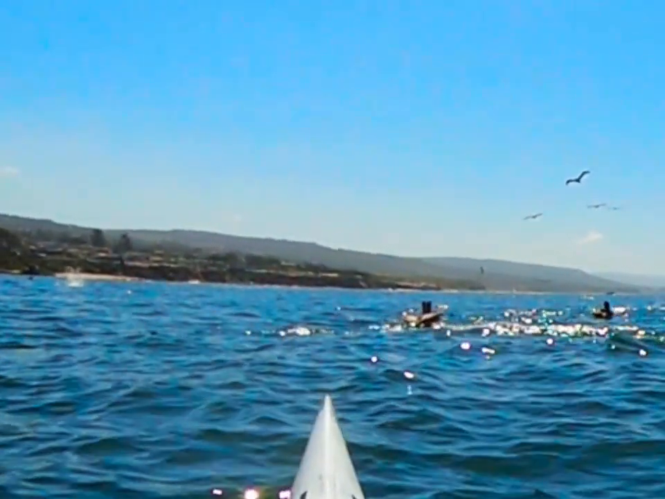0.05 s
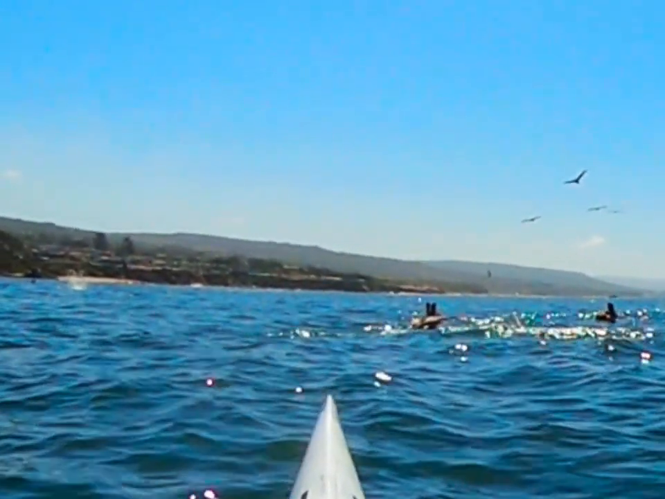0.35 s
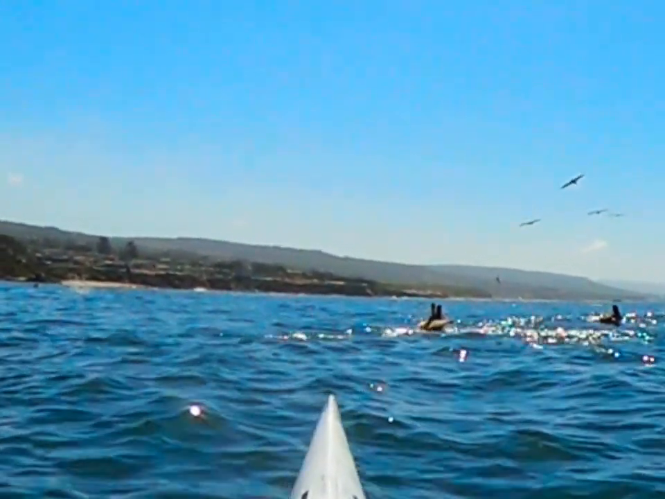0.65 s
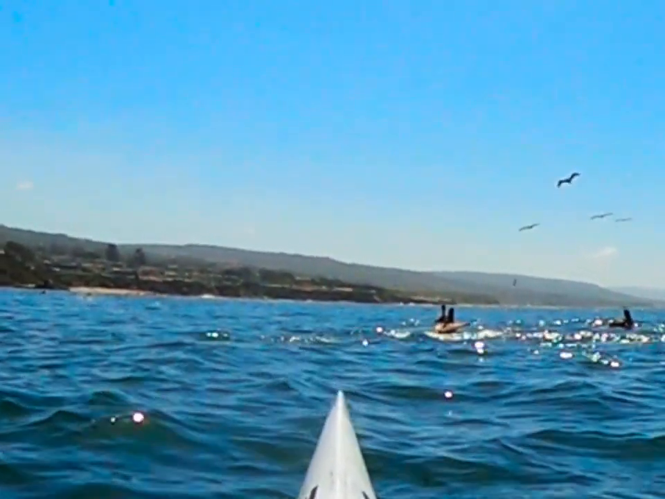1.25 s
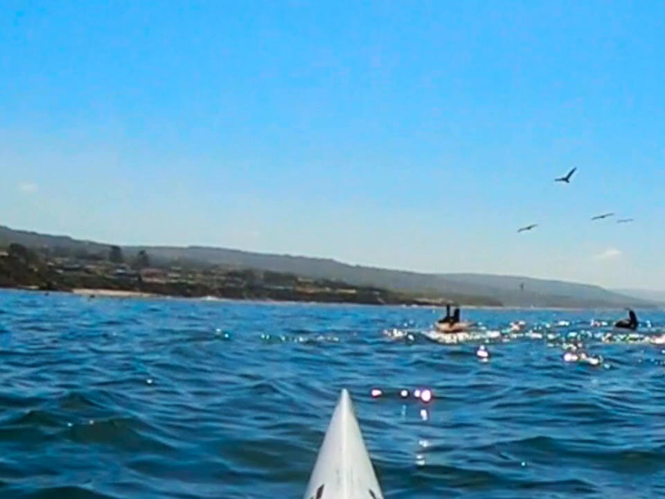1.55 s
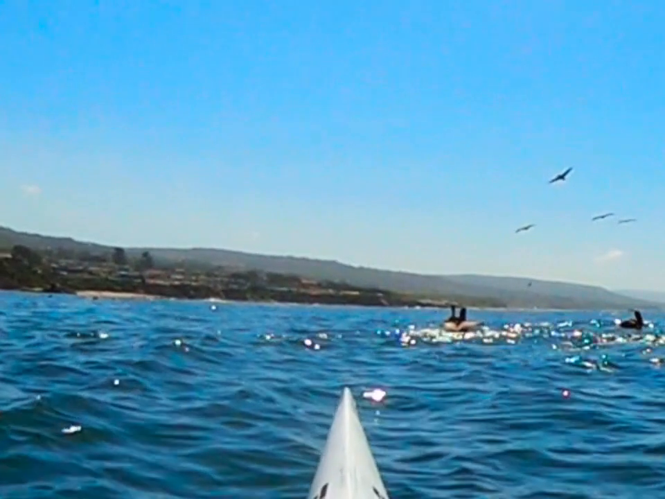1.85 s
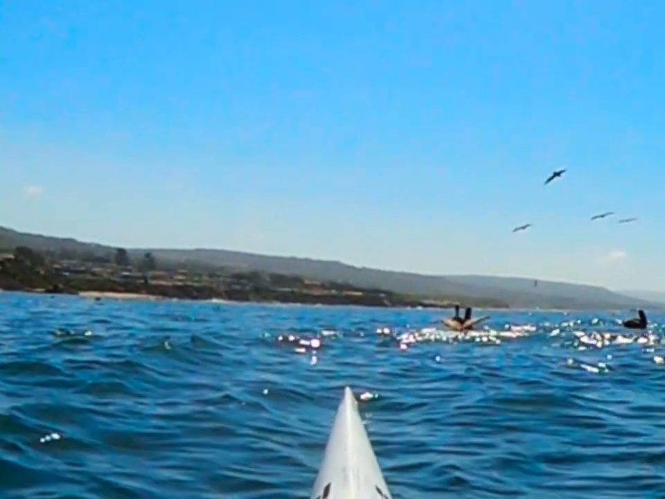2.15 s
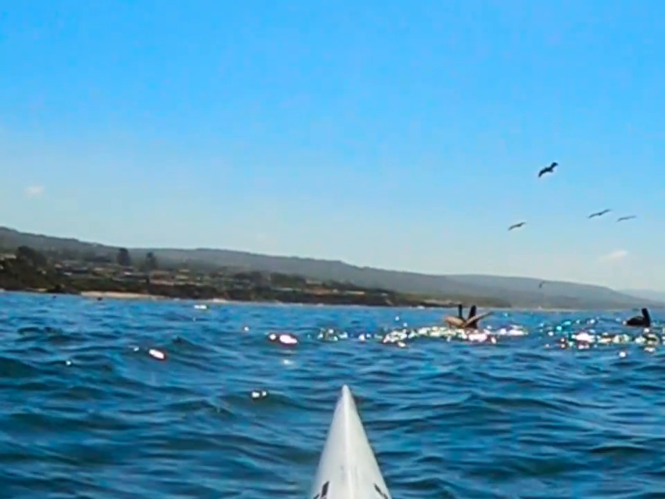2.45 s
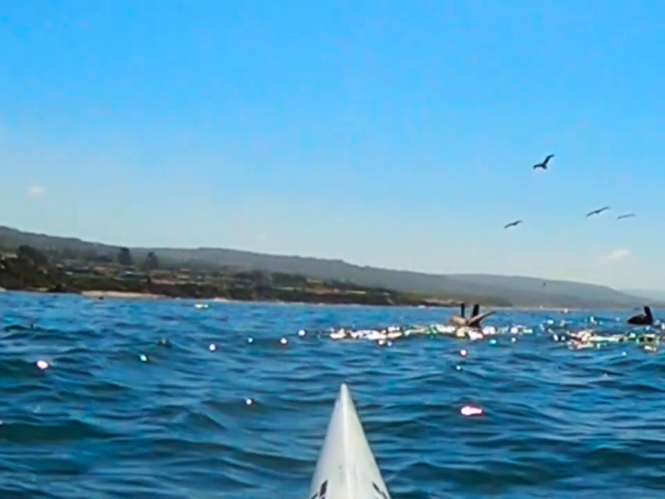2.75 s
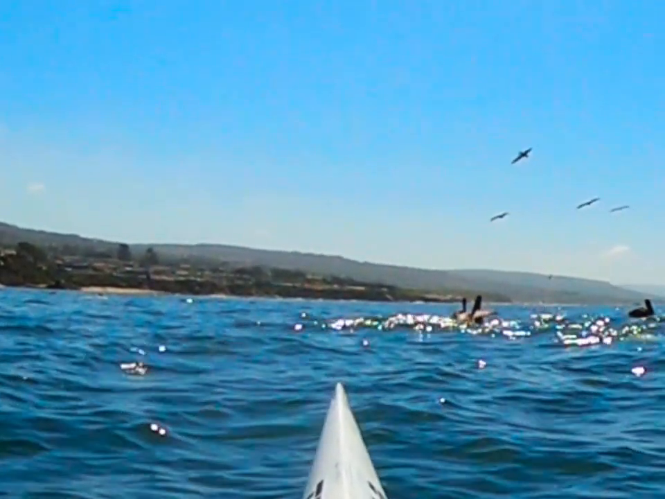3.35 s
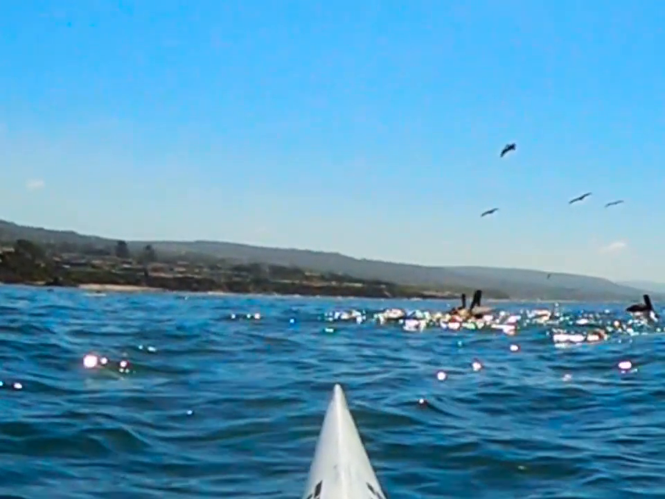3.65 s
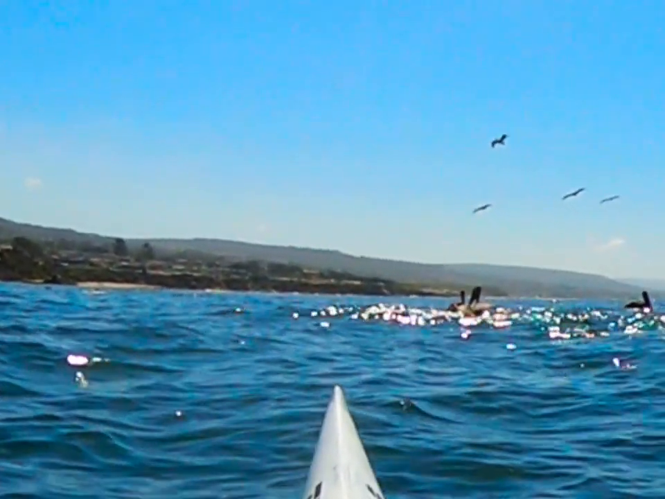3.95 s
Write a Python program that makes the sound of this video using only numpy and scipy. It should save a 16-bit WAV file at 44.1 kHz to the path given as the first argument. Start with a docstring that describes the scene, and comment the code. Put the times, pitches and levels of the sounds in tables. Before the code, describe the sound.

Sea water sloshes against a kayak, first gulping and slapping lightly under the bow, then splashing harder and draining away in bubbles and drips. It sounds muffled through a sealed microphone on deck, with wind rumbling throughout.

```python
"""A kayak rides a choppy sea, heard from a camera in a sealed housing on its deck.
Wind rumbles on the housing from the start. From about 1 s air pockets gulp under the bow and a
wavelet slaps the hull. Near 1.9 s a larger one splashes, then drains away in bubbles and drips.
Throughout, the housing wall dulls the water and the camera's low sample rate adds a faint glassy edge."""
import sys
import numpy as np
from scipy import signal
from scipy.fft import rfft, irfft
from scipy.io import wavfile

SR = 44100
rng = np.random.default_rng(int(sys.argv[2]) if len(sys.argv) > 2 else 0)


def transcribe(u):
    """Save the signal u as a 16-bit wav file named by the first command-line argument.

    u: samples, shape (n,) or (channels, n), limited to [-1, 1]; the rate is SR.
    q: integer samples, one column per channel.
    """
    v = np.clip(np.atleast_2d(u).T, -1, 1)
    q = np.round(v * 32767).astype(np.int16)
    wavfile.write(sys.argv[1], SR, q)


N = 176400
T = np.arange(N) / SR


def from_db(db):
    """Decibels to gain."""
    return 10 ** (np.asarray(db) / 20)


def unit_power(x):
    """Scale to an RMS of one."""
    return x / np.sqrt(np.mean(x ** 2) + 1e-20)


def fader(rows):
    """A gain ride through (seconds, dB) points."""
    return from_db(np.interp(T, *np.transpose(rows)))


def equalise(x, points):
    """Causal (minimum-phase) EQ that follows (Hz, dB) points."""
    size = 2 * N
    hz, db = np.transpose(points)
    curve = np.interp(np.log(np.arange(N + 1) * SR / size + 1), np.log(hz), db)
    cepstrum = irfft(np.log(from_db(curve)))
    cepstrum[1:N] *= 2
    cepstrum[N + 1:] = 0
    return irfft(rfft(x, size) * np.exp(rfft(cepstrum)))[:N]


def noise(points):
    """Steady noise coloured by (Hz, dB) points, at unit power."""
    hz, db = np.transpose(points)
    curve = np.interp(np.log(np.arange(N // 2 + 1) * SR / N + 1), np.log(hz), db)
    return unit_power(irfft(rfft(rng.standard_normal(N)) * from_db(curve), N))


def drift(per_s):
    """Random wander through per_s new values a second, at unit power."""
    knots = rng.standard_normal(4000)
    return unit_power(np.interp(T * per_s, np.arange(len(knots)), knots))


def add(out, start_s, sound):
    """Drop a sound into the mix at its cue."""
    i = int(np.clip(start_s * SR, 0, N - 1))
    out[i:i + len(sound)] += sound[:N - i]


def bubble(hz, cycles, pitch_rise=0.044, attack_s=0.00055):
    """A bubble rings down by 60 dB in so many cycles, rising a little in pitch."""
    life_s = cycles / hz
    t = T[:int(life_s * SR) + 2]
    tone = np.sin(2 * np.pi * hz * t * (1 + pitch_rise * t / life_s / 2))
    return tone * np.exp(-np.log(1000) * t / life_s) * (1 - np.exp(-t / attack_s))


def bubble_cloud(per_s, low_hz, high_hz, cycles, spread_db, tilt_db):
    """Bubbles of random time, level and pitch, tilted in dB per octave, at unit power."""
    out = np.zeros(N)
    draws = rng.random((6000, 4))
    for when, pitch, strength, ring in draws[:int(per_s * N / SR)]:
        hz = low_hz * (high_hz / low_hz) ** pitch
        db = spread_db * min(-np.log(1 - strength), 3) + tilt_db * np.log2(hz / low_hz)
        add(out, when * N / SR, from_db(db) * bubble(hz, cycles * (.5 + ring)))
    return unit_power(out)


# The tone of the open sea's wash. Each row: frequency in Hz, relative level in dB.
SEA_TONE = [(120, -9), (220, -1), (420, -2.5), (620, -10.5), (1000, -20), (1800, -25.5), (2100, -39.5),
            (2400, -63.5), (5000, -79.5)]


def sea():
    """The open sea washes softly behind everything, its level wavering."""
    return from_db(-58 + drift(per_s=16)) * noise(SEA_TONE)


# The ride of the gusts. Each row: time in seconds, level in dB.
WIND_RIDE = [(0, -28), (.42, -35.5), (.66, -30.5), (.9, -32), (1.4, -34.5), (1.72, -34), (2.4, -33),
             (2.9, -33.5), (3.4, -33), (4, -31)]
# The wind's deep rumble. Each row: frequency in Hz, relative level in dB.
WIND_TONE = [(10, 4.5), (20, 8.5), (48, 7), (68, -5), (100, -7.5), (170, -21.5), (300, -42), (700, -84),
             (2500, -110)]


def wind():
    """Wind buffets the housing."""
    return fader(WIND_RIDE) * noise(WIND_TONE)


# The swell of the hull's drumming. Each row: time in seconds, level in dB.
DRUM_RIDE = [(0, -60), (.9, -58.5), (1.5, -51.5), (2.05, -43.5), (2.5, -46.5), (2.85, -46), (3.45, -56),
             (3.75, -44), (4, -55)]
# Its low boom. Each row: frequency in Hz, relative level in dB.
DRUM_TONE = [(50, -19.5), (90, 5.5), (150, 8), (210, 2), (300, -21), (600, -63.5), (2500, -91.5)]


def hull_drum():
    """The hull drums unevenly in the chop."""
    return fader(DRUM_RIDE) * noise(DRUM_TONE) * from_db(1.5 * drift(per_s=11))


# The heave of water along the hull. Each row: time in seconds, relative level in dB.
SLOSH_RIDE = [(0, -58.5), (.55, -54), (.85, -58), (1.15, -48.5), (1.26, -48.5), (1.45, -47.5), (1.6, -51),
              (1.81, -49.5), (1.89, -39.5), (2.01, -37.5), (2.15, -45.5), (2.25, -48), (2.36, -45),
              (2.45, -46), (2.7, -56), (2.95, -54), (3.5, -65.5), (4, -56)]


def slosh():
    """Large, low bubbles roll in churning water along the hull."""
    bubbles = bubble_cloud(per_s=210, low_hz=188, high_hz=446, cycles=11, spread_db=2, tilt_db=0.5)
    churn = noise([(100, -4.5), (200, -6.5), (350, -2.5), (520, -16), (800, -18.5), (1600, -62)])
    return fader(SLOSH_RIDE) * (from_db(-2) * bubbles + from_db(-2.5) * churn)


# Gulps under the bow. Each row: start in seconds, glide time in seconds,
# pitch in Hz at the start and at the end of that time, relative level in dB.
GULP_CUES = [(0.974, 0.043, 280, 279, -45), (1.075, 0.035, 221, 215.5, -40),
             (1.148, 0.029, 260, 216, -38.5), (1.182, 0.04, 279, 357, -47), (1.254, 0.037, 938, 840, -50),
             (1.305, 0.012, 335, 287, -37), (1.323, 0.032, 219, 268, -33), (1.355, 0.034, 271.7, 405, -33),
             (1.839, 0.034, 306, 293, -31.5), (1.918, 0.015, 410, 325, -30.5),
             (2.024, 0.022, 272, 210, -42), (2.294, 0.017, 240, 202, -37), (2.34, 0.031, 343, 307, -42),
             (2.551, 0.032, 255, 225, -42), (2.69, 0.059, 263, 253.5, -44),
             (2.977, 0.033, 1342, 1300, -55.5)]


def gulps(attack_s=0.004, release_s=0.0099, pitch_wobble=0.04):
    """Each trapped air pocket rings, gliding in pitch as the water squeezes or frees it."""
    out = np.zeros(N)
    waver = from_db(0.6 * drift(per_s=130))
    for start_s, glide_s, first_hz, last_hz, db in GULP_CUES:
        t = T[:int((glide_s + release_s) * SR)]
        glide_hz = first_hz * (last_hz / first_hz) ** (t / glide_s)
        hz = glide_hz * (1 + pitch_wobble * drift(per_s=200)[:len(t)])
        phase = 2 * np.pi * np.cumsum(hz) / SR
        tone = np.sin(phase) + from_db(-24) * np.sin(2 * phase)
        ramp = np.clip(np.minimum(t / attack_s, (t[-1] - t) / release_s), 0, 1)
        add(out, start_s, from_db(db) * np.sin(ramp * np.pi / 2) ** 2 * tone)
    return out * waver


# Handfuls of spray landing on the deck. Each row: start in seconds, relative level in dB.
SPATTER_CUES = [(1.145, -53), (1.315, -52), (1.859, -43), (2.079, -49), (2.303, -37.5), (2.542, -35),
                (2.649, -46.5), (3.208, -68)]


def spatters(decay_s=0.011):
    """Fine drops land together in a short, bright patter."""
    bursts, t = np.zeros(N), T[:SR // 12]
    for start_s, db in SPATTER_CUES:
        add(bursts, start_s, from_db(db) * np.exp(-t / decay_s))
    sizzle = noise([(1200, -26), (2200, -5.5), (3000, -1.5), (4300, 2)])
    return bursts * sizzle * from_db(8.6 * drift(per_s=340))


# The ride of spray and foam. Each row: time in seconds, relative level in dB.
SPRAY_RIDE = [(0, -94.5), (.9, -91), (1.15, -72.5), (1.28, -69.5), (1.45, -62.5), (1.62, -79), (1.8, -58),
              (1.868, -40.5), (1.92, -47), (2.0, -53.5), (2.06, -57), (2.11, -60.5), (2.24, -58.5),
              (2.32, -58), (2.46, -59), (2.56, -51.5), (2.68, -55.5), (2.82, -69.5), (2.95, -61),
              (3.07, -79), (3.18, -63.5), (3.28, -74.5), (3.345, -61.5), (3.42, -86.5), (4, -91.5)]
# The bright tone of spray, foam and slap cracks. Each row: frequency in Hz, relative level in dB.
SPRAY_TONE = [(200, -22), (500, -5.5), (1300, -3.5), (2500, -5), (6000, -6)]


def spray(ticks_per_s=450):
    """The waves throw up ticking spray and hissing foam."""
    impulses = (rng.random(N) < ticks_per_s / SR) * rng.choice([-1, 1], N)
    accents = from_db(1.1 * np.minimum(rng.exponential(1, N), 3))
    ticks = unit_power(equalise(impulses * accents, SPRAY_TONE))
    foam = noise(SPRAY_TONE) * from_db(2.2 * drift(per_s=70))
    return fader(SPRAY_RIDE) * (from_db(4.5) * ticks + from_db(1.5) * foam)


# The surge of bubbling at the bow. Each row: time in seconds, relative level in dB.
SPLASH_RIDE = [(0, -71), (.95, -73.5), (1.16, -65), (1.27, -56.5), (1.47, -55.5), (1.62, -67.5),
               (1.82, -56), (1.87, -40.5), (1.92, -42.5), (1.99, -55), (2.04, -49.5), (2.085, -45),
               (2.17, -48), (2.2, -54), (2.28, -56), (2.37, -56.5), (2.5, -59.5), (2.57, -53), (2.82, -63),
               (3.07, -65.5), (3.22, -68.5), (3.5, -79), (4, -84)]


def splash():
    """Water breaks into small bubbles and crackling droplets in a soft wash."""
    bubbles = bubble_cloud(per_s=520, low_hz=513, high_hz=2068, cycles=35, spread_db=2.5, tilt_db=1)
    crackle = bubble_cloud(per_s=280, low_hz=747, high_hz=2620, cycles=4.1, spread_db=6.5, tilt_db=1.5)
    wash = noise([(200, -16), (500, -3.5), (1300, -5), (2000, -3), (3000, -14.5), (6000, -43)])
    return fader(SPLASH_RIDE) * (from_db(-1) * bubbles + from_db(-8) * (crackle + wash))


# The foreground slaps and drips. Each row: start in seconds, bubble pitch in Hz,
# relative bubble level in dB, ring length in cycles, relative crack level in dB.
SLAP_CUES = [(1.015, 2600, -60, 44, -67), (1.209, 1520, -46, 8, -42), (1.254, 1080, -33.5, 11, -40.5),
             (1.378, 1200, -26.5, 7.7, -44), (1.381, 1020, -38.5, 20, -50.5), (1.422, 1630, -42, 18, -34),
             (1.439, 1587, -37, 25, -37.5), (1.441, 625, -40, 18, -41), (1.477, 780, -37.5, 8.3, -43.5),
             (1.54, 710, -43, 10, -54.5), (1.732, 1130, -41.5, 16.6, -47.5), (1.828, 1830, -39.5, 32, -52),
             (1.86, 1135, -30, 12, -28), (1.86, 3110, -27, 12, -34), (1.872, 920, -29, 8, -31),
             (1.884, 864, -30, 12, -34), (1.92, 1020, -29, 13.4, -33), (1.945, 300, -18, 2.9, -47),
             (1.966, 580, -32.5, 13, -33), (1.974, 920, -39.5, 9.1, -44), (2.012, 574, -26, 7.7, -40.5),
             (2.077, 2110, -28, 18, -35), (2.081, 1334, -30, 10, -40.5), (2.085, 622, -25, 6.9, -44),
             (2.118, 1230, -33.5, 8.6, -42), (2.133, 755, -38, 14, -46), (2.158, 1160, -35, 23, -46),
             (2.163, 1460, -32.5, 10, -45), (2.213, 1096, -45.5, 42, -54), (2.306, 630, -42.5, 37, -41),
             (2.366, 1330, -42.5, 27, -39), (2.386, 730, -43.5, 19, -45), (2.462, 1570, -42.5, 22, -46),
             (2.537, 1020, -42, 17, -53), (2.546, 1400, -45, 29, -44), (2.557, 1060, -43, 24, -45),
             (2.584, 1260, -46.5, 35, -50), (2.574, 555, -44, 16, -52), (2.628, 3160, -42.5, 55, -50),
             (2.891, 1230, -49, 21, -53), (2.903, 2710, -48.5, 36, -62.5), (2.927, 3030, -43, 29, -59),
             (2.958, 1090, -42, 18, -44), (2.963, 1500, -41, 25, -36), (3.181, 790, -52, 51, -67.5),
             (3.208, 604, -48, 13, -53)]


def slaps(crack_decay_s=0.0093):
    """Water hits the hull with a brief crack and leaves a ringing bubble."""
    rings, cracks = np.zeros(N), np.zeros(N)
    t = T[:SR // 20]
    for start_s, hz, bubble_db, cycles, crack_db in SLAP_CUES:
        add(rings, start_s, from_db(bubble_db) * bubble(hz, cycles))
        crack = rng.standard_normal(len(t)) * np.exp(-t / crack_decay_s)
        add(cracks, start_s, from_db(crack_db) * crack)
    return from_db(5) * rings + from_db(-1.5) * equalise(cracks, SPRAY_TONE)


def hull_ring(x, t60_s=0.085, build_s=0.013, wet_db=-12):
    """The hollow hull adds a short, dense ring."""
    t = T[:SR // 4]
    envelope = np.exp(-np.log(1000) * t / t60_s) * (1 - np.exp(-t / build_s))
    tail = rng.standard_normal(len(t)) * envelope
    tail /= np.sqrt(np.sum(tail ** 2))
    return x + from_db(wet_db) * signal.fftconvolve(x, tail)[:N]


# What the housing wall lets through. Each row: frequency in Hz, gain in dB.
HOUSING_EQ = [(100, -1.5), (800, -0.5), (1300, 0.5), (1700, -7), (2000, -14), (2450, -18), (3100, -14.5),
              (3600, -21.5), (4100, -32.5), (4700, -47.5)]


def housing(x):
    """The sealed wall muffles the top end."""
    return equalise(x, HOUSING_EQ)


def scene():
    """The water heard through the housing wall, over wind, drumming hull and sea."""
    surface = splash() + spray() + slaps() + spatters()
    water = hull_ring(surface) + slosh() + gulps()
    return (housing(water) + wind() + hull_drum() + sea())[None]


def record(dry, band_hz=4300, step=4, hiss_db=-101, top_cut_hz=14800):
    """The camera's low sample rate mirrors the sound faintly into the treble, over a trace of hiss."""
    band_limit = signal.ellip(8, .2, 70, band_hz, fs=SR, output="sos")
    top_cut = signal.ellip(8, .2, 70, top_cut_hz, fs=SR, output="sos")
    narrow = signal.sosfilt(band_limit, dry[0])
    glassy = np.interp(T, T[::step], narrow[::step])  # sparse samples joined by straight lines
    hiss = from_db(hiss_db) * rng.standard_normal(N)
    return signal.sosfilt(top_cut, glassy + hiss)[None]


dry = scene()
out = record(dry)
transcribe(out)
```